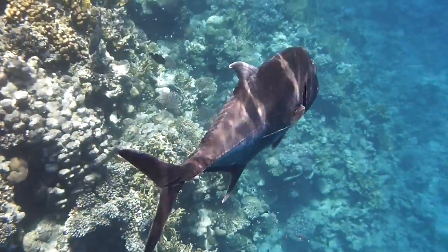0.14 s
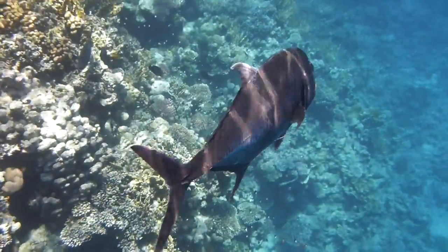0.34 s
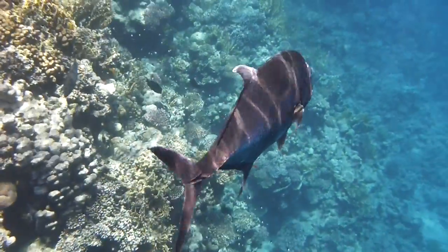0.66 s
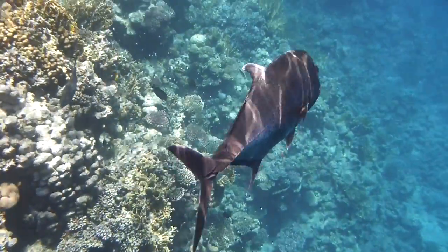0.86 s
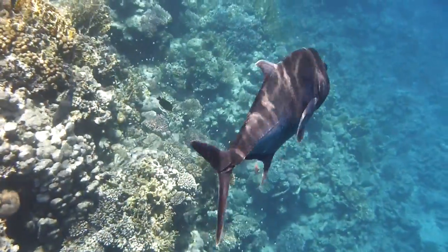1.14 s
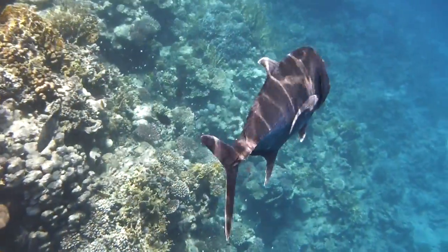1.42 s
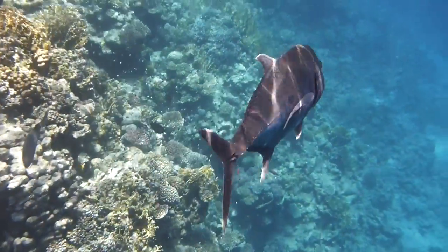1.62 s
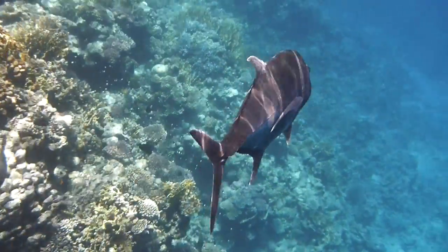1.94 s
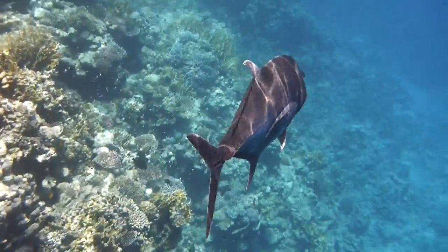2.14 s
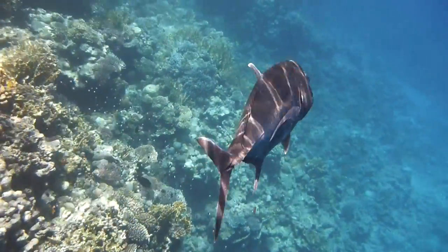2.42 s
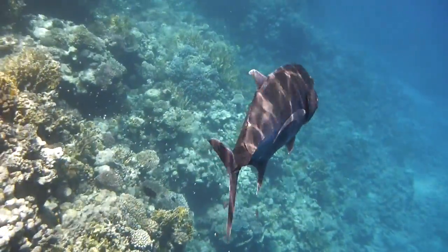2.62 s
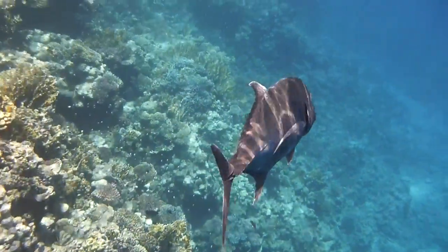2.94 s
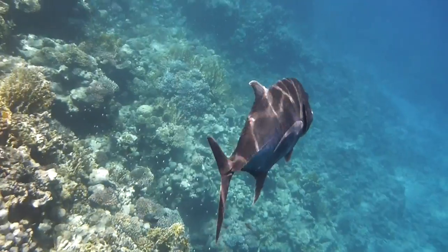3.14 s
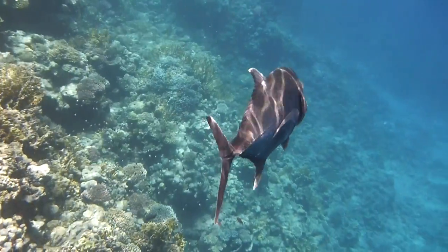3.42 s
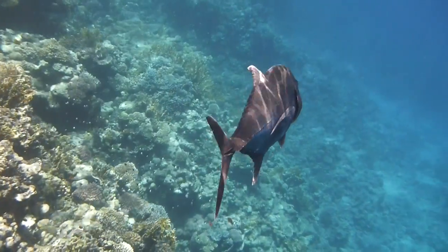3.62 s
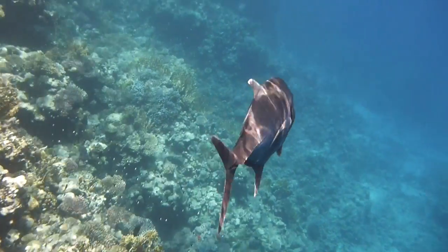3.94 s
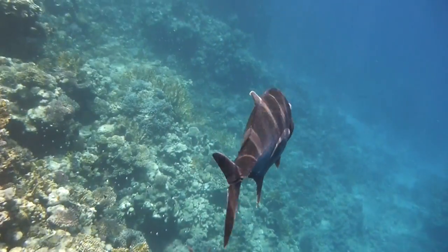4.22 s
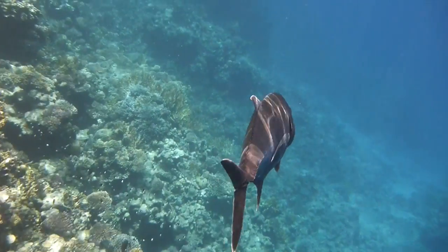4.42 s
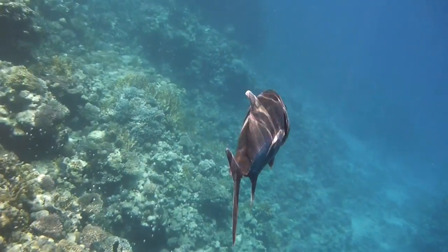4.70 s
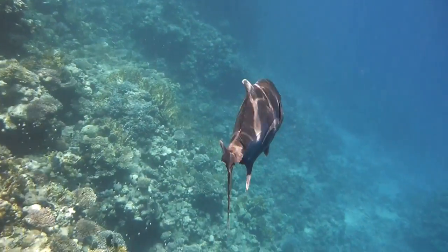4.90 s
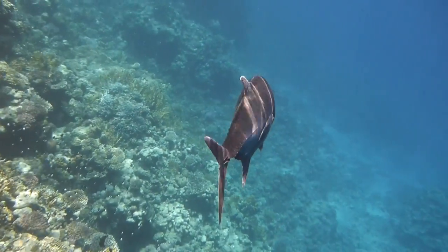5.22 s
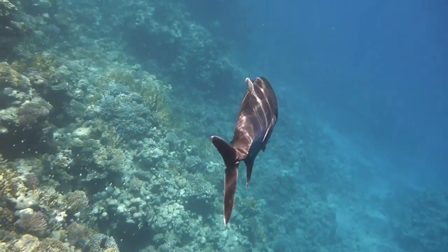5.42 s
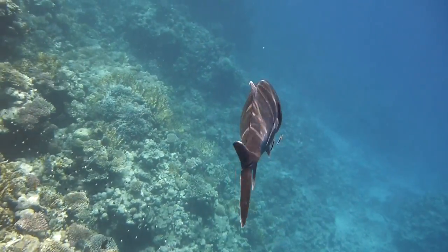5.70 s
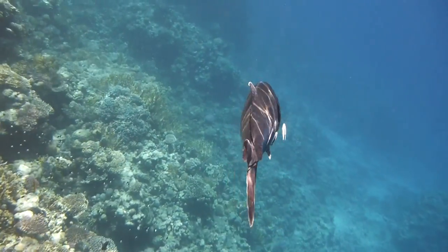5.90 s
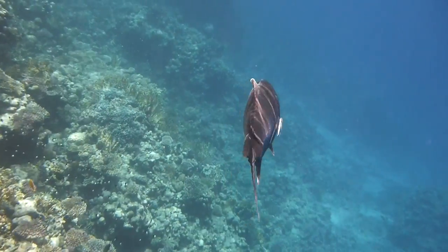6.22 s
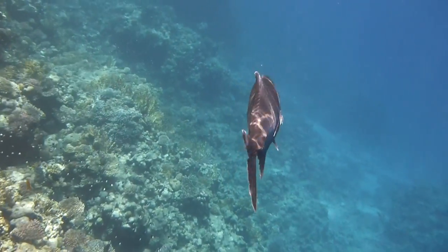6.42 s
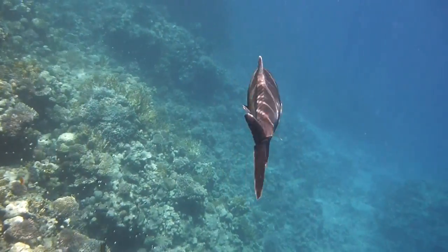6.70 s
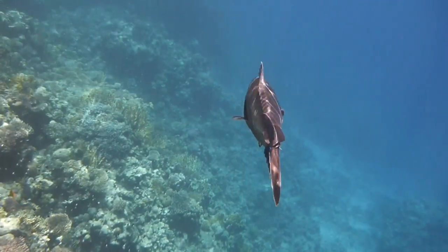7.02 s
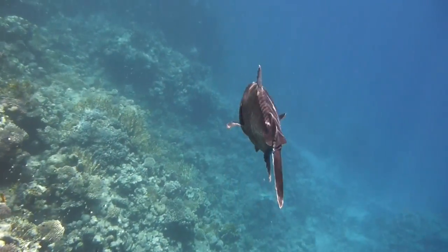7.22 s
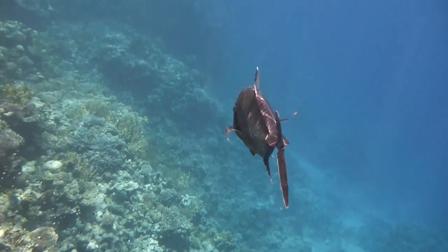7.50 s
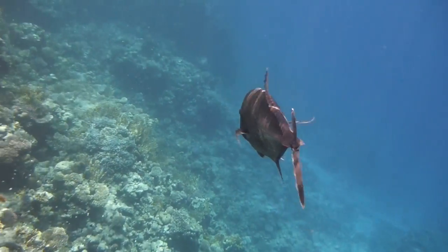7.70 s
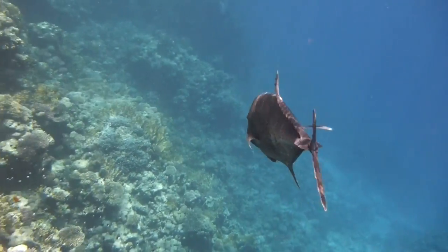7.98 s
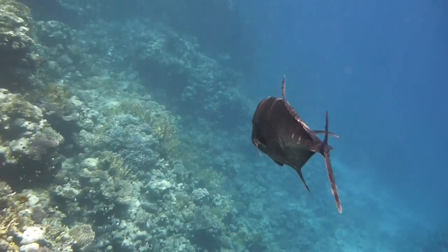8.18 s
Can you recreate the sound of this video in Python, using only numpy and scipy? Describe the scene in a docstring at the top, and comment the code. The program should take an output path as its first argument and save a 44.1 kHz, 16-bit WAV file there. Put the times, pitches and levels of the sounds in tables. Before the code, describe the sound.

Underwater at a coral reef, heard in mono through a sealed camera housing. Throughout, a distant shrimp colony makes grainy, frying hiss, strongest around 1.5 to 4 kHz, filled with small dry ticks, over a soft low water wash. Close snaps crack irregularly: one at 0.05 s, several from 1.1 to 1.8, a cluster at 2.5 to 3.2 with very loud hits near 2.66 and 3.2, then more at 3.9, 4.9, 5.5, 6.3, 7.0 to 7.4 and 8.3. The loudest clip and briefly duck everything. Tiny bubble blips come near 1.85 and 5.67. A faint thin whine rises around 4 s and lingers. From 4.3 to the end, dull scuffs and low thumps touch the housing, most noticeably near 6.8. A faint ragged motor hum around 800 Hz comes and goes, becoming an evenly pulsing flutter after 7.3 s.

```python
"""Snapping shrimp crackle over a coral reef, around a camera in a watertight housing.
Far snaps merge into filtered-noise hiss; nearer ones are clicks that ring housing modes, the loudest overloading.
Water is a low noise wash with decaying-sine bubbles; low bumps are soft tone bursts; a small motor hums in short
harmonic steps over a faint whine; scuffs ring low housing modes. Gain control ducks after the loudest snaps."""
import sys
import numpy as np
from scipy import signal
from scipy.fft import rfft, irfft
from scipy.io import wavfile
from scipy.ndimage import map_coordinates

SR = 44100
rng = np.random.default_rng(int(sys.argv[2]) if len(sys.argv) > 2 else 0)


def unload_audio(sound):
    """Save the sound as a 16-bit wav file, at the path given as the first command line argument."""
    columns = np.transpose(np.atleast_2d(sound))
    # keep every value between -1 and 1, then stretch to whole-number steps
    steps = np.round(np.clip(columns, -1, 1) * 32767)
    wavfile.write(sys.argv[1], SR, steps.astype(np.int16))


N = 368235


def from_db(db):
    """Decibels to amplitude gain."""
    return 10 ** (np.asarray(db) / 20)


def rms_one(x):
    """Scale to unit rms."""
    return x / np.sqrt(np.mean(x ** 2) + 1e-20)


def in_time(rows):
    """Interpolate (time_s, value) rows at every sample."""
    return np.interp(np.arange(N) / SR, *np.transpose(rows))


def seconds(length_s):
    """Sample times of a short sound, from zero."""
    return np.arange(int(length_s * SR)) / SR


def add(out, start_s, sound):
    """Mix a sound into out from start_s, cut at the end."""
    i = max(0, round(start_s * SR))
    out[i:i + len(sound)] += sound[:max(0, N - i)]


def band(x, low_hz, high_hz):
    """Causal band-pass."""
    sos = signal.butter(3, [low_hz, high_hz], "band", fs=SR, output="sos")
    return signal.sosfilt(sos, x + 1e-18)


def ring(drive, hz, t60_s):
    """Damped mode as a two-pole resonator; a unit click gives about unit energy."""
    radius = from_db(-60 / (t60_s * SR))
    angle = 2 * np.pi * hz / SR
    poles = [1, -2 * radius * np.cos(angle), radius * radius]
    return np.sqrt(2 * (1 - radius * radius)) * signal.lfilter([.5, 0, -.5], poles, drive + 1e-18)


def coloured(x, spectrum):
    """Shape x with a minimum-phase filter through (freq_hz, density_db) points; unit rms."""
    hz, db = np.transpose(spectrum)
    grid_hz = np.linspace(0, SR / 2, 2049)
    gain = from_db(np.interp(np.log(grid_hz + 1), np.log(hz), db))
    cepstrum = irfft(np.log(gain))
    # doubling the causal half of the cepstrum makes the response causal
    response = irfft(np.exp(rfft(2 * cepstrum[:len(grid_hz) - 1], len(cepstrum))))
    return rms_one(signal.fftconvolve(x, response)[:N])


def drift(knots_per_s):
    """Smooth random curve through knots; unit rms."""
    knots = rng.standard_normal(2000)
    return rms_one(map_coordinates(knots, [np.arange(N) / SR * knots_per_s], order=3, mode="wrap"))


def blow(t, scatter_db, scatter_s, tail_db, tail_s):
    """Unit click plus decaying noise: close reflections and a fainter tail."""
    close, far = rng.standard_normal((2, len(t)))
    close = close * np.exp(-t / scatter_s)
    far = far * np.exp(-t / tail_s)
    reflections = from_db(scatter_db) * close / np.linalg.norm(close)
    tail = from_db(tail_db) * far / np.linalg.norm(far)
    return (t == 0) + reflections + tail


# far hiss spectrum: freq_hz, relative_density_db_per_hz
HISS_SPECTRUM = [(600, -20), (1000, -6.5), (1300, 1.5), (1650, 4), (2400, 2.5), (3100, -4.5), (3900, -1),
                 (4900, -12), (5400, -8.5), (6300, -20), (7500, -14.5), (10000, -31), (12000, -48),
                 (15500, -87)]


def far_hiss(per_s):
    """Sparse random clicks, thousands a second, merge into a grainy coloured hiss."""
    clicks = rng.standard_normal(N) * (rng.random(N) < per_s / SR)
    return coloured(clicks, HISS_SPECTRUM)


# housing modes, also rung by near snaps: mode_hz, level_db, t60_s
HOUSING_MODES = [(1620, 2.5, 0.027), (1950, 4, 0.0039), (2370, 0, 0.0099), (3166, 0, 0.0074),
                 (3750, 0, 0.0059), (4570, -3.5, 0.015), (5499, -9, 0.0024), (6500, -15.5, 0.009),
                 (7070, -7, 0.0017), (8360, -13, 0.0012), (10630, -21.5, 0.0032), (12800, -33, .001),
                 (14800, -28, .001)]


def crackle(per_s, spread_db, limit, focus_db_per_octave):
    """Mid-distance snaps: few strong, many weak, each favouring modes near its own pitch."""
    count = int(per_s * N / SR)
    at = rng.integers(0, N, count)
    own_octave = rng.uniform(np.log2(1300), np.log2(15000), count)
    size_db = spread_db * np.minimum(-np.log((np.arange(count) + 1) / count), limit)
    out = np.zeros(N)
    for hz, db, t60_s in HOUSING_MODES:
        mode_db = size_db - focus_db_per_octave * np.abs(np.log2(hz) - own_octave)
        clicks = np.zeros(N)
        clicks[at] = from_db(mode_db) * rng.choice([-1, 1], count)
        out += from_db(db) * band(ring(clicks, hz, t60_s), hz * .7, min(hz * 1.4, SR * .45))
    paths = blow(seconds(.04), scatter_db=-5, scatter_s=.001, tail_db=-12, tail_s=.005)
    return rms_one(signal.fftconvolve(out, paths)[:N])


# far-colony level curve: time_s, hiss_rms_db
COLONY_LEVEL = [(0, -37.5), (1, -35.5), (2, -36.5), (2.6, -35), (3.5, -37.5), (4.3, -38), (5.5, -36.5),
                (6.5, -37), (7.5, -36), (8.35, -36)]


def colony():
    """Far hiss and mid-distance crackle share one slightly wavering level."""
    hiss = far_hiss(per_s=5000)
    ticks = crackle(per_s=420, spread_db=5.3, limit=3.6, focus_db_per_octave=16)
    waver_db = .5 * drift(knots_per_s=9)
    return from_db(in_time(COLONY_LEVEL) + waver_db) * (hiss + from_db(-3.0) * ticks)


# wash spectrum: freq_hz, relative_density_db_per_hz
WASH_SPECTRUM = [(25, -18), (60, -19), (130, -10), (250, -4), (370, 1.5), (520, -7), (770, 1), (1000, -7.5),
                 (1600, -30.5)]
# wash swell, added to the base level: time_s, offset_db
WASH_SWELL = [(0, 0.5), (1, 2), (2.3, 2), (3.6, 1), (4.6, -1), (6, 1.5), (7.2, -1), (8.35, 1)]
WASH_BASE_DB = -45


def wash():
    """Low noise of the water, slowly swelling."""
    return from_db(WASH_BASE_DB + in_time(WASH_SWELL)) * coloured(rng.standard_normal(N), WASH_SPECTRUM)


# housing mode groups, rows body, crack, sizzle: low_hz, high_hz
MODE_GROUPS = [(1350, 3230), (3000, 5680), (5500, 9200)]


def modes_between(drive, low_hz, high_hz):
    """Housing modes within one band, alternating in sign."""
    rings = sum(from_db(db) * ring(drive, hz, t60_s) * (-1) ** k
                for k, (hz, db, t60_s) in enumerate(HOUSING_MODES) if low_hz < hz < high_hz)
    return band(rings, low_hz, high_hz)


def snap(peak_db, crack_db, sizzle_db, body_hz, crack_hz, body_t60_s, crack_t60_s, air_db):
    """A claw's collapsing cavity: a click rings the housing with a colour of its own."""
    pulse = blow(seconds(.04), scatter_db=-3.5, scatter_s=.0015, tail_db=-12, tail_s=.004)
    body = band(ring(pulse, body_hz, body_t60_s), *MODE_GROUPS[0])
    crack = band(ring(pulse, crack_hz, crack_t60_s), *MODE_GROUPS[1])
    sizzle = modes_between(pulse, *MODE_GROUPS[2])
    air = band(pulse, 9000, 15500)
    parts = [(body, 0), (crack, crack_db), (sizzle, sizzle_db), (air, sizzle_db + air_db)]
    sound = sum(from_db(db) * part / np.linalg.norm(part) for part, db in parts)
    return from_db(peak_db) * sound / np.abs(sound).max()


# nearest snaps: start_s, peak_db, crack_re_body_db, sizzle_re_body_db, body_hz, crack_hz
NEAREST_SNAPS = [(0.0541, -9, -14, -41, 2330, 3440), (0.5523, -15.5, -20, -16, 2120, 3400),
                 (0.6171, -12, 0.5, -8, 2310, 4100), (1.103, -16, -6, 3, 2580, 4430),
                 (1.2741, -11.5, -1, -7, 2370, 4030), (1.4593, -13, 2, -14, 2200, 3720),
                 (1.463, -3, -9.5, -20, 1980, 3770), (1.5981, -12, 6, 13, 2170, 5200),
                 (1.6562, -4.5, -3, -8, 2300, 3520), (1.7793, -14.5, 4, 2.5, 2400, 3730),
                 (2.4849, -8, -3.5, -13.5, 2330, 3220), (2.5503, -13.5, 6, -10, 2100, 3440),
                 (2.6064, -13.5, 6, 8, 1700, 4280), (2.6344, -10, -9, -18, 1860, 4300),
                 (2.6608, 5.5, -8.5, -34, 2310, 4190), (2.8176, -13, -7, -12, 2180, 3850),
                 (2.9607, -7.5, -7, -18, 2210, 3580), (3.0763, -8.5, 13, 27, 2270, 4950),
                 (3.2141, 5, -3.5, -16.5, 2320, 4780), (3.8796, -11.5, -11, -16, 2240, 4500),
                 (3.928, -1, -10, -15.5, 2300, 4100), (4.0766, -6.5, -9.5, -20, 1940, 3720),
                 (4.218, -7.5, 8, 1.5, 1870, 3800), (4.7622, -3, -8.5, -15.5, 2020, 4240),
                 (4.9375, 1, 2, -13, 2370, 3340), (4.9463, -10.5, 21, 13, 1830, 4365),
                 (4.988, -11, 5, -1, 1670, 3800), (5.4985, -0.5, 3, -22, 2480, 4650),
                 (5.803, -4.5, -3, -41, 2360, 3600), (5.8713, -8, 0, -2.5, 2560, 5330),
                 (5.8981, -13.5, 11, 0, 2220, 3660), (5.9316, -11.5, 9, 2, 2310, 3900),
                 (6.2625, -7, 1.5, -3, 2540, 5530), (6.2811, 2, -6.5, -32, 2360, 3900),
                 (6.9364, -7, 4.5, -7, 2290, 3560), (6.9583, -7, 4, -21, 2370, 4080),
                 (7.0269, -0.5, 0, -19, 1970, 4040), (7.0923, -11, 3, -6, 2300, 4230),
                 (7.1239, 3, -6.5, -23, 2000, 4110), (7.1507, -8.5, -8, -20, 2280, 3860),
                 (7.3192, -11, -5, -28, 1920, 3610), (7.3805, 3, 1, -32, 2400, 3910),
                 (7.8001, -8.5, -4, -13, 2360, 4060), (8.255, -7.5, -5, -11, 2680, 3540),
                 (8.3282, 1, -4.5, -16.5, 2400, 3830)]
# lesser snaps, columns mean, spread; rows peak_db, crack_re_body_db, sizzle_re_body_db, body_hz, crack_hz
LESSER_SNAP_STATS = [(-19, 2.3), (3, 5.1), (-2, 6), (2173, 180), (4100, 500)]
LESSER_PER_S = 5.5


def near_snaps():
    """Nearest shrimp at set times, plus lesser ones, one at random in each equal slot."""
    out = np.zeros(N)
    count = int(LESSER_PER_S * N / SR)
    mean, spread = np.transpose(LESSER_SNAP_STATS)
    starts_s = (np.arange(count) + rng.random(count)) / LESSER_PER_S
    colours = mean + spread * rng.standard_normal((count, len(mean)))
    lesser = np.column_stack([starts_s, colours])
    for start_s, *colour in [*NEAREST_SNAPS, *lesser]:
        add(out, start_s, snap(*colour, body_t60_s=.0049, crack_t60_s=.0063, air_db=-17.5))
    return out


# motor harmonics: multiple, level_db
MOTOR_HARMONICS = [(1, 2.5), (2, -1), (3, -2)]
# motor step curve: time_s, level_db, timing_spread_s
MOTOR_STEPS = [(0, -72, .02), (1.4, -50, .02), (2.8, -63, .02), (3.6, -51, .02), (4.4, -60, .02),
               (5.2, -51.5, .01), (6.1, -58, .02), (6.55, -44.5, .015), (6.95, -57, .01),
               (7.27, -60, 0.0054), (7.35, -42.5, .003), (8.0, -42.5, .003), (8.3, -40, .003)]
MOTOR_HZ, STEP_S = 797, .068
FIRST_STEP_S, STEP_EVERY_S = .078, .0799


def motor_steps(wander_hz, uneven_db):
    """Short harmonic tone bursts, ragged in timing, later evenly paced."""
    out, t = np.zeros(N), seconds(STEP_S)
    times_s, levels_db, spreads_s = np.transpose(MOTOR_STEPS)
    envelope = signal.windows.tukey(len(t), .8)
    for centre_s in np.arange(FIRST_STEP_S, N / SR, STEP_EVERY_S):
        db = np.interp(centre_s, times_s, levels_db)
        late_s = np.interp(centre_s, times_s, spreads_s) * rng.standard_normal()
        turns = (MOTOR_HZ + wander_hz * rng.standard_normal()) * t + rng.random()
        tone = np.zeros(len(t))
        for multiple, order_db in MOTOR_HARMONICS:
            gain = from_db(order_db + uneven_db * rng.standard_normal())
            tone += gain * np.sin(2 * np.pi * round(multiple) * turns)
        add(out, centre_s + late_s - STEP_S / 2, from_db(db) * np.sqrt(2) * envelope * tone)
    return out


# whine level curve: time_s, rms_db
WHINE_LEVEL = [(0, -56), (3.6, -44.5), (4.2, -39.5), (5.3, -40.5), (7.3, -42), (8.35, -47.5)]
WHINE_HZ, WHINE_WIDTH_HZ = 2370, 230


def motor_whine(throb_db):
    """Narrow-band noise with an irregular throb."""
    whine = band(rng.standard_normal(N), WHINE_HZ - WHINE_WIDTH_HZ / 2, WHINE_HZ + WHINE_WIDTH_HZ / 2)
    return from_db(in_time(WHINE_LEVEL)) * rms_one(whine * from_db(throb_db * drift(knots_per_s=16)))


BUMP_S = .042


def bump(level_db, hz):
    """Soft low thump: a sine under a bell, narrower in time at higher pitch."""
    t = seconds(BUMP_S)
    swell = np.hanning(len(t)) * np.exp(-(hz * (t - BUMP_S / 2) / .64) ** 2)
    return from_db(level_db) * np.sqrt(2) * swell * np.sin(2 * np.pi * (hz * t + rng.random()))


# low bumps; the 340-350 Hz ones are the boom of knocks on the housing;
# length up to BUMP_GAP_S = single bump: centre_s, flurry_length_s, level_db, pitch_hz
LOW_BUMPS = [(.52, 0, -49, 100), (1.173, 0, -41, 104), (3.291, 0.035, -33, 303), (3.679, 0.0084, -41, 118),
             (4.295, 0, -30, 99), (4.643, 0.097, -36.5, 120), (4.99, 0.025, -28, 340),
             (4.999, 0.084, -43, 99), (5.336, 0.027, -40.5, 98), (5.881, 0.021, -37.5, 104),
             (6.668, 0.032, -42, 144), (6.779, 0.0099, -25, 350), (7.251, 0, -44, 93),
             (7.566, 0.028, -45, 120), (7.95, .3, -46, 94.5)]
BUMP_GAP_S, BUMP_SPREAD_DB, BUMP_SPREAD_OCTAVES = .024, 5, .4
BUMP_FADE_DB = 4  # fall over a flurry


def bumps():
    """Low tone bursts, single or in uneven, weakening flurries."""
    out = np.zeros(N)
    for centre_s, length_s, db, hz in LOW_BUMPS:
        first_s = centre_s - BUMP_S / 2
        add(out, first_s, bump(db, hz))
        for delay_s in np.arange(BUMP_GAP_S, length_s, BUMP_GAP_S):
            late, louder, higher = rng.uniform(-1.01, 1, 3)
            own_db = db + BUMP_SPREAD_DB * louder - BUMP_FADE_DB * delay_s / length_s
            own_hz = hz * 2 ** (BUMP_SPREAD_OCTAVES * higher)
            add(out, first_s + delay_s + BUMP_GAP_S / 2 * late, bump(own_db, own_hz))
    return out


# bubbles, level before onset and decay: start_s, level_db, pitch_hz, t60_s
BUBBLE_EVENTS = [(1.841, -14.5, 1620, 0.03), (1.868, -22, 1170, 0.031), (5.667, -11, 1567, 0.048)]


def bubbles():
    """Each bubble is a decaying sine with a soft onset."""
    out, t = np.zeros(N), seconds(.1)
    for start_s, db, hz, t60_s in BUBBLE_EVENTS:
        envelope = from_db(db - 60 * t / t60_s) * (1 - np.exp(-hz * t / 2))
        add(out, start_s, envelope * np.sin(2 * np.pi * hz * t))
    return out


# dull scuffs on the housing: start_s, peak_db
SCUFFS = [(4.5, -22), (4.684, -20), (4.984, -18), (5.235, -20.5), (5.394, -17), (5.424, -22),
          (5.462, -20.5), (5.65, -19), (5.791, -19.5), (5.833, -19.5), (5.866, -21.5), (6.065, -20.5),
          (6.22, -17), (6.56, -18.5), (6.687, -19), (6.771, -12), (6.912, -21), (7.311, -23.5),
          (7.357, -20), (8.019, -21.5), (8.251, -17)]
# low housing modes: mode_hz, level_db, t60_s
SHELL_MODES = [(340, -2, 0.023), (692, 1, 0.021), (960, -3, 0.018), (1080, 1.5, 0.033), (1290, 11, 0.0066),
               (1700, 6.5, 0.0078)]


def knocks(soft_hz):
    """Soft scuffing contacts: a smeared pulse rings the low housing modes."""
    out, t = np.zeros(N), seconds(.1)
    for start_s, peak_db in SCUFFS:
        pulse = blow(t, scatter_db=5, scatter_s=.005, tail_db=-10, tail_s=.012)
        rings = sum(from_db(db) * ring(pulse, hz, t60_s) * (-1) ** k
                    for k, (hz, db, t60_s) in enumerate(SHELL_MODES))
        knock = band(rings, 165, soft_hz)
        add(out, start_s, from_db(peak_db) * knock / np.abs(knock).max())
    return out


def scene():
    """Reef, water and camera, summed to one channel."""
    shrimp = colony() + near_snaps()
    water = wash() + bubbles()
    motor = motor_steps(wander_hz=7.6, uneven_db=2.2) + motor_whine(throb_db=1.5)
    contacts = bumps() + knocks(soft_hz=2300)
    return (shrimp + water + motor + contacts)[None]


def gain_control(x, threshold_db, ratio, release_db_per_s, attack_s):
    """Peaks over the threshold pull the gain down; it recovers linearly in dB."""
    over_db = ratio * np.maximum(20 * np.log10(np.abs(x) + 1e-9) - threshold_db, 0)
    ramp_db = release_db_per_s * np.arange(N) / SR
    held_db = np.maximum.accumulate(over_db + ramp_db, axis=-1) - ramp_db
    r = np.exp(-1 / (attack_s * SR))
    return x * from_db(-signal.lfilter([1 - r], [1, -r], held_db))


# narrow recorder notches: centre_hz, width_hz
RECORDER_NOTCHES = [(2890, 186), (7850, 180), (11750, 680)]
TOP_CUT_HZ = 15900


def record(dry):
    """Gain control, overload clipping, bass cut, narrow notches, steep top cut."""
    x = gain_control(dry, threshold_db=-.5, ratio=.68, release_db_per_s=6, attack_s=.006)
    x = np.clip(x, -1.05, 1.05)
    x = signal.sosfilt(signal.butter(1, 35, "high", fs=SR, output="sos"), x)
    for hz, width_hz in RECORDER_NOTCHES:
        x = signal.lfilter(*signal.iirnotch(hz, hz / width_hz, fs=SR), x)
    return signal.sosfilt(signal.ellip(10, .2, 90, TOP_CUT_HZ, fs=SR, output="sos"), x)


dry = scene()
out = record(dry)
unload_audio(out)
```